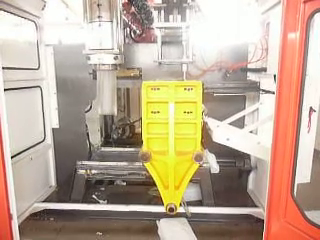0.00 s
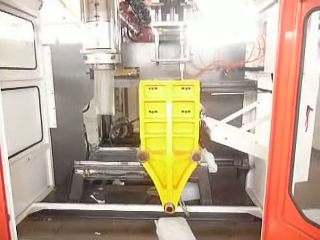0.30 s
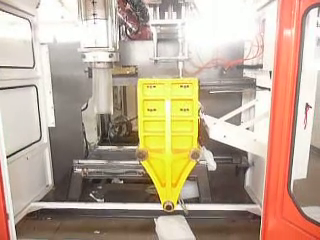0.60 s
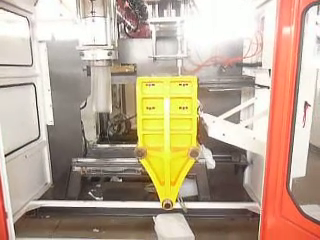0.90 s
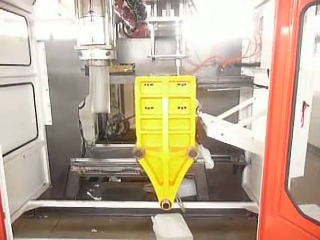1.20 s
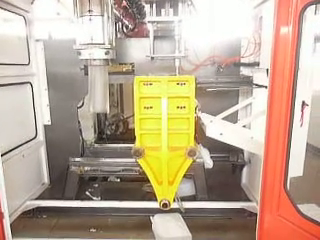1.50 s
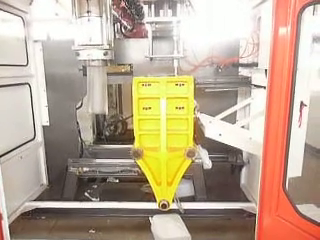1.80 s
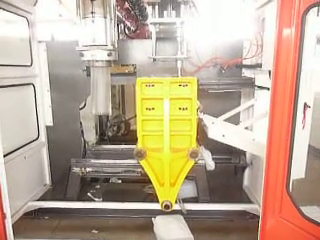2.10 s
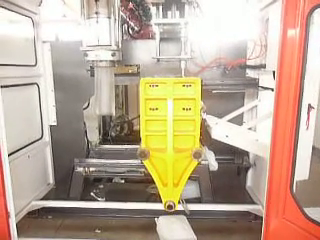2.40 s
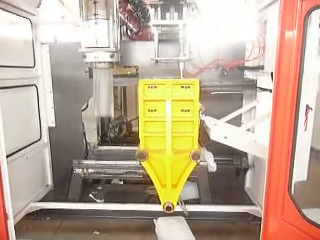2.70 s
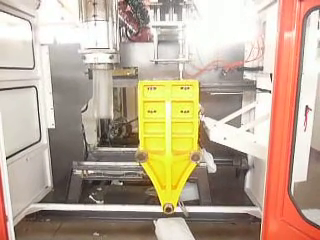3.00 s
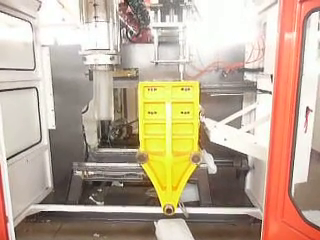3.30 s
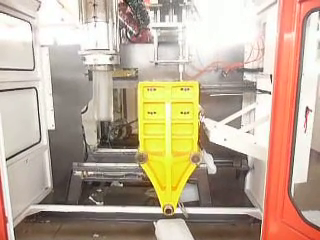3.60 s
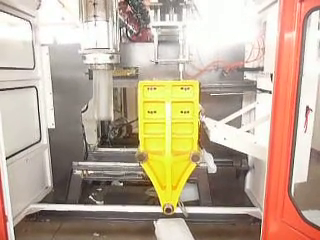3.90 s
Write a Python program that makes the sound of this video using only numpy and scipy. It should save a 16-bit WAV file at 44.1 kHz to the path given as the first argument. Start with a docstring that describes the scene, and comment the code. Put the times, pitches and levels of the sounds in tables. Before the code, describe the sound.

A molding machine's hydraulic pump drones, then eases off as a rough, shrill squeal begins.

```python
"""The hydraulic pump of a blow molding machine drones, with rushing oil, over motor hum, a thin
high whine and the hiss of a factory hall. A little past halfway the pump's load falls away and
a rough, shrill squeal sets in, probably oil forced through a valve. The squeal is noise in narrow
resonances: it creeps upward in pitch and now and then catches on a single note."""
import sys
import numpy as np
from scipy import signal
from scipy.fft import rfft, irfft, next_fast_len
from scipy.io import wavfile
from scipy.ndimage import uniform_filter1d, map_coordinates

SR = 44100
rng = np.random.default_rng(int(sys.argv[2]) if len(sys.argv) > 2 else 0)


def bounce(signal):
    """Save signal as a 16-bit WAV file at the path given by the first command-line argument."""
    frames = np.transpose(np.atleast_2d(signal))
    limited = np.clip(frames, -1, 1)
    pcm = np.round(limited * 32767).astype(np.int16)
    wavfile.write(sys.argv[1], SR, pcm)


N = 176400
TIME_S = np.arange(N) / SR
SHAFT_HZ = 23.5


def amp(db):
    """Decibels to gain."""
    return 10 ** (np.asarray(db) / 20)


def unit_rms(x):
    """x scaled to rms 1."""
    return x / np.sqrt(np.mean(x ** 2) + 1e-20)


def curve(rows):
    """Linear interpolation of (seconds, value) rows."""
    return np.interp(TIME_S, *np.transpose(rows))


def swell(peak_s, length_s):
    """Gaussian envelope, peak 1."""
    return np.exp(-2 * ((TIME_S - peak_s) / length_s) ** 2)


def wobble(knots_per_s):
    """Smooth random curve."""
    return map_coordinates(rng.standard_normal(4096), [TIME_S * knots_per_s + 2], mode="wrap")


def filtered(x, response):
    """x filtered by a gain function of frequency in Hz."""
    size = next_fast_len(N + SR // 2)
    hz = np.fft.rfftfreq(size, 1 / SR)
    return irfft(rfft(x, size) * response(hz), size)[:N]


def patchy_spectra(patchy_db):
    """Short-time spectra of noise whose narrow bands swell and fade independently."""
    hz, frame_s, spectra = signal.stft(rng.standard_normal(N), SR, nperseg=2048)
    patches = uniform_filter1d(rng.standard_normal(spectra.shape), size=2, axis=0)
    patches = uniform_filter1d(patches, size=6, axis=1)
    return hz[:, None], frame_s, spectra * amp(patchy_db * unit_rms(patches))


def rush(colour, patchy_db):
    """Patchy noise shaped by (Hz, dB) rows, rms 1."""
    knot_hz, knot_db = np.transpose(colour)
    _, _, spectra = patchy_spectra(patchy_db)
    noise = signal.istft(spectra)[1][:N]
    return unit_rms(filtered(noise, lambda hz: amp(np.interp(np.log(hz + 1), np.log(knot_hz), knot_db))))


def tone(hz, drift_rad, knots_per_s, waver_db):
    """Sine with wandering phase and level, rms 1."""
    phase = 2 * np.pi * (hz * TIME_S + rng.random()) + drift_rad * wobble(knots_per_s)
    return unit_rms(np.sin(phase) * amp(waver_db * wobble(knots_per_s)))


# Hall noise spectrum. Each row: frequency in Hz, relative density in dB.
HALL_SPECTRUM = [(20, -14.5), (130, -1), (500, 1), (950, -2), (1300, -2.5), (1750, -1), (2400, -2.5),
                 (2750, 0), (3020, 3.5), (3250, -1.5), (3680, -3), (3850, -6.5), (4100, -15), (4350, -24.5),
                 (4550, -51)]

def hall_hiss(level_db=-38):
    """Near-steady hiss of the factory hall."""
    return amp(level_db + 0.53 * wobble(6.2)) * rush(HALL_SPECTRUM, patchy_db=3)


# Whine envelope. Each row: time in seconds, level in dB.
WHINE_ENVELOPE = [(0, -46), (.3, -47.5), (.55, -39.5), (.72, -57), (1, -46), (1.3, -54), (1.6, -47),
                  (1.82, -37.5), (1.95, -44.5), (2.08, -51), (4, -55.5)]

def thin_whine(hz=3000.7):
    """Thin, flickering high tone near 3 kHz."""
    return amp(curve(WHINE_ENVELOPE)) * tone(hz, drift_rad=0.55, knots_per_s=45, waver_db=5)


# Pump load. Each row: time in seconds, gain in dB.
PUMP_LOAD = [(0, 1), (.17, 1.2), (.4, 0.5), (.63, 0.5), (.92, -1), (1.07, 2), (1.25, 1.5), (1.42, -1),
             (1.65, 0.5), (1.9, 1.5), (2.15, -1), (2.31, 1.2), (2.39, -5), (2.52, -7.5), (2.85, -6.5),
             (3.3, -7.5), (3.75, -6), (4, -5)]

def load_db():
    """Load curve shared by motor and pump."""
    return curve(PUMP_LOAD)


# Motor hum. Each row: multiple of the shaft rate, loaded level in dB, unloaded level in dB.
SHAFT_HARMONICS = [(3, -42.5, -54.5), (6, -50, -49.5), (12, -40.5, -47.5), (15, -46, -58)]

def motor_hum():
    """Shaft harmonics whose balance shifts as the load falls."""
    load = load_db()
    load_fraction = (load - load.min()) / np.ptp(load)
    hum = np.zeros(N)
    for multiple, loaded_db, idle_db in SHAFT_HARMONICS:
        gain = amp(idle_db + (loaded_db - idle_db) * load_fraction)
        hum += gain * tone(multiple * SHAFT_HZ, drift_rad=0.11, knots_per_s=9, waver_db=0.5)
    return hum


# Leak spectrum. Each row: frequency in Hz, relative density in dB.
LEAK_SPECTRUM = [(1500, -21.5), (2100, -3), (2500, 1.5), (3100, -1), (3600, -10.5), (4400, -37.5)]

def valve_leak(peak_db=-37):
    """Soft hiss as the valve begins to open."""
    return amp(peak_db) * swell(peak_s=2.22, length_s=0.44) * rush(LEAK_SPECTRUM, patchy_db=1.5)


# Squeaks. Each row: peak time in seconds, length in seconds, pitch in Hz, relative level in dB.
SQUEAK_NOTES = [(2.44, 0.14, 1880, -29), (2.47, 0.14, 1972, -33.5), (2.48, 0.16, 1658, -32.5),
                (2.45, 0.083, 3397, -38), (2.67, 0.12, 1660, -31), (2.7, 0.11, 2012, -32),
                (2.89, 0.11, 1785, -35.5), (2.99, 0.083, 2134, -32.5), (3.01, 0.078, 1953, -29.5),
                (3.26, .17, 1983, -31), (3.297, .35, 3460, -39.5), (3.52, .12, 1835, -37),
                (3.74, .1, 1668, -30), (3.78, .1, 2412, -38), (3.83, 0.34, 1838, -33.5),
                (3.842, .25, 3548, -40)]

def valve_squeaks(gain_db=-5):
    """Short, rough notes on which the squeal catches."""
    squeaks = np.zeros(N)
    for peak_s, length_s, hz, db in SQUEAK_NOTES:
        note = tone(hz, drift_rad=0.64, knots_per_s=50, waver_db=-0.5)
        squeaks += amp(db) * swell(peak_s, length_s) * note
    return amp(gain_db) * squeaks


# Valve noise spectrum. Each row: frequency in Hz, relative density in dB.
VALVE_SPECTRUM = [(1000, -34), (1450, -20), (1560, -6), (1670, 0.5), (1950, 0), (2100, -6.5), (2450, -4.5),
                  (2780, -16.5), (3020, -6.5), (3280, -10.5), (3650, -14), (3900, -23), (4300, -30),
                  (4550, -58)]
# Ringing of valve and pipe. Each row: frequency in Hz, level in dB relative to the flow.
PIPE_TONES = [(1674, -14.5), (1782, -15.5), (1830, -13.5), (1940, -16.5), (1981, -20), (2180, -12),
              (2250, -16.5), (2369, -18.5), (3031, -19), (3461, -17.5)]
# Rising resonances. Each row: Hz on opening, rise in Hz/s, width in Hz, dB relative to the flow.
VALVE_GLIDES = [(2110, 150, 150, -3.5), (3382, 130, 110, -9)]
# Flow through the valve. Each row: time in seconds, level in dB.
VALVE_FLOW = [(0, -77), (2.15, -55), (2.33, -41), (2.44, -39.5), (2.52, -34.5), (2.57, -38), (2.65, -33.5),
              (3, -32), (3.1, -33), (3.25, -33), (3.75, -33.5), (4, -33)]

def valve_squeal(open_s=2.39):
    """Flow noise in fixed and rising resonances, plus the ringing of valve and pipe."""
    squeal = rush(VALVE_SPECTRUM, patchy_db=3.5)
    for hz, db in PIPE_TONES:
        squeal += amp(db) * tone(hz, drift_rad=0.53, knots_per_s=20, waver_db=2)
    for open_hz, rise_hz_per_s, width_hz, db in VALVE_GLIDES:
        hz, frame_s, spectra = patchy_spectra(patchy_db=3.5)
        centre_hz = open_hz + rise_hz_per_s * (frame_s - open_s)
        detuning = (hz - centre_hz) / width_hz
        band = signal.istft(spectra / (1 + detuning ** 2 / 2))[1][:N]
        squeal += amp(db) * unit_rms(band)
    return amp(curve(VALVE_FLOW) + 0.49 * wobble(25)) * squeal


# Oil noise spectrum. Each row: frequency in Hz, relative density in dB.
OIL_SPECTRUM = [(20, -22), (45, -15.5), (90, -6), (140, -5.5), (230, -2), (430, 0), (600, -1), (730, -3.5),
                (870, -1.5), (1050, -7.5), (1300, -8.5), (1620, -7), (1900, -7), (2150, -14.5),
                (3000, -16.5), (3700, -22), (4300, -40), (4550, -71.5)]

def oil_rush(gain_db=-29.5, throb_depth=0.093):
    """Rushing oil that follows the load and throbs twice per shaft turn."""
    throb = 1 + throb_depth * np.sin(2 * np.pi * 2 * SHAFT_HZ * TIME_S)
    return amp(gain_db + load_db()) * throb * rush(OIL_SPECTRUM, patchy_db=1.5)


# Steady tones of the drone, with faint side tones 125 Hz apart.
# Each row: frequency in Hz, relative level in dB.
DRONE_TONES = [(78.7, -58.5), (160.3, -49.5), (213.6, -42.5), (258.7, -56.5), (269.8, -39.5), (300.1, -46),
               (398.7, -45), (404.7, -39), (416, -37.5), (427.3, -48), (438.4, -43), (476.7, -36.5),
               (500.3, -45), (581.6, -42), (618.5, -46), (648.7, -45), (654.7, -49), (750.3, -50),
               (773.8, -44.5), (798.2, -52), (843.2, -49.5), (851.9, -45.5), (860.1, -46.5), (898.7, -44),
               (921.7, -52), (968, -54), (1011.1, -50.5), (1574, -47.5), (1585.2, -52.5), (1607.7, -50),
               (1618.9, -55), (1744.7, -52), (2751.4, -52.5), (2875, -58)]
# Envelope of the pump's main note. Each row: time in seconds, level in dB.
NOTE_ENVELOPE = [(0, -35.5), (.42, -32.5), (.8, -30.5), (1.2, -32.5), (1.45, -34.5), (1.8, -34),
                 (2.05, -29.5), (2.3, -30), (2.55, -36.5), (3.25, -36.5), (3.75, -36), (3.93, -32)]

def pump_drone(note_hz=523.8, drone_gain_db=-1):
    """Droning tones that follow the load; the main note swells independently on top."""
    drone = sum(amp(db) * tone(hz, drift_rad=0.35, knots_per_s=5, waver_db=1.5) for hz, db in DRONE_TONES)
    note = amp(curve(NOTE_ENVELOPE)) * tone(note_hz, drift_rad=0.22, knots_per_s=10, waver_db=0.6)
    return amp(drone_gain_db + load_db()) * drone + note


def scene():
    """Mono sum of all sources."""
    background = hall_hiss() + thin_whine() + motor_hum()
    valve = valve_leak() + valve_squeaks() + valve_squeal()
    return (background + valve + oil_rush() + pump_drone())[None]


def record(dry):
    """Brick-wall low-pass at 4540 Hz."""
    return filtered(dry[0], lambda hz: hz < 4540)[None]


dry = scene()
out = record(dry)
bounce(out)
```